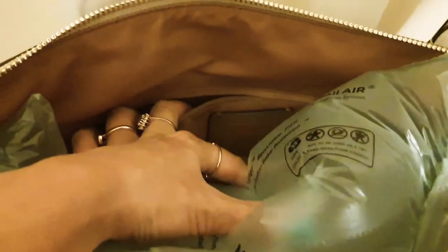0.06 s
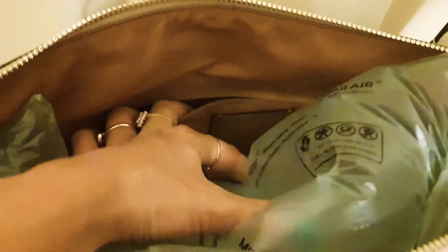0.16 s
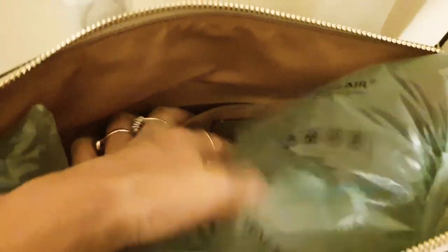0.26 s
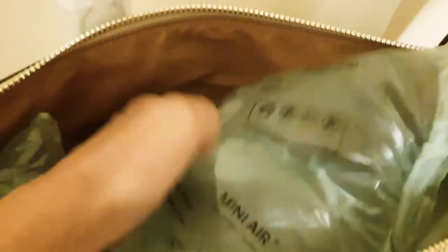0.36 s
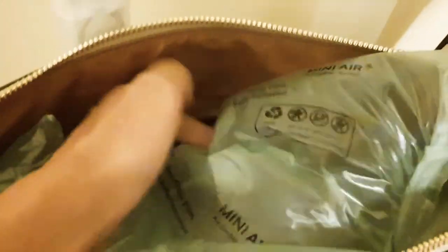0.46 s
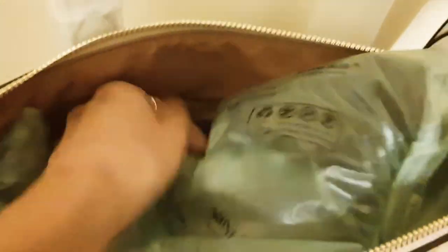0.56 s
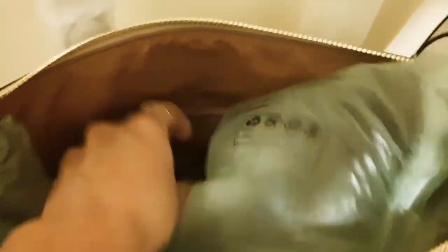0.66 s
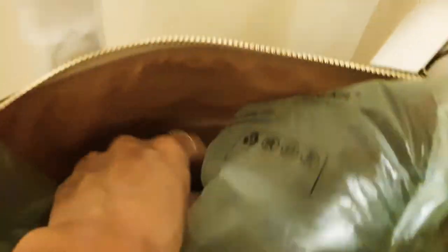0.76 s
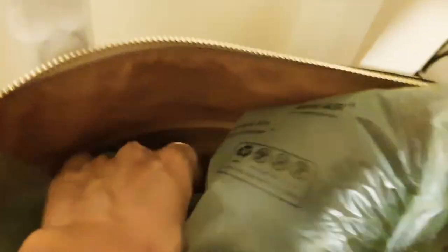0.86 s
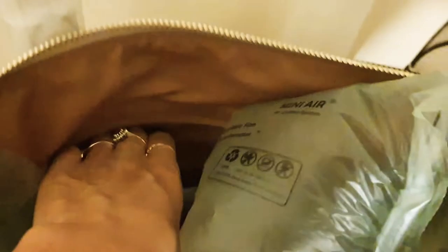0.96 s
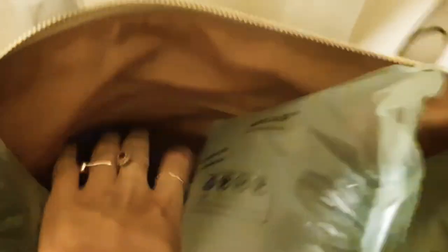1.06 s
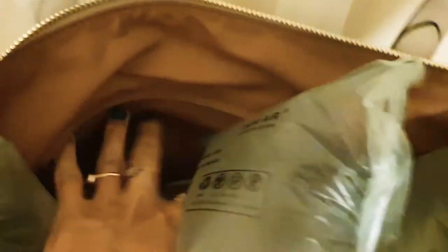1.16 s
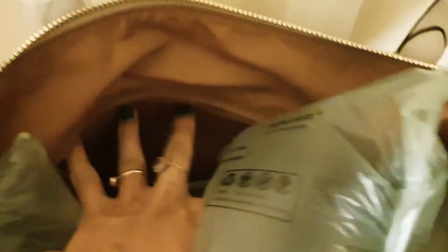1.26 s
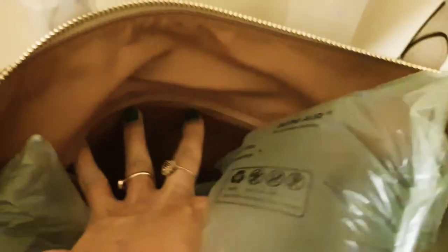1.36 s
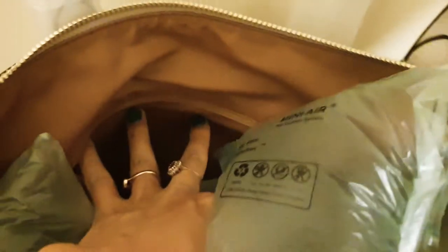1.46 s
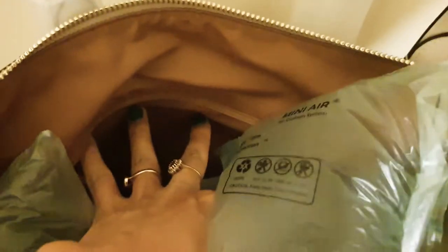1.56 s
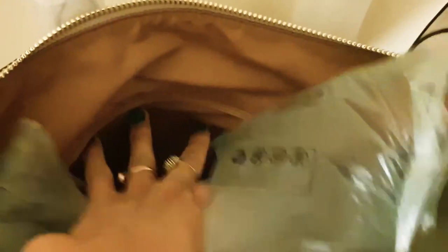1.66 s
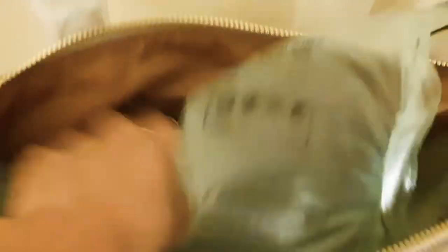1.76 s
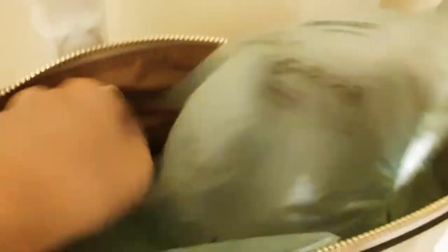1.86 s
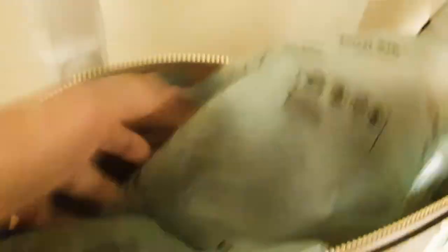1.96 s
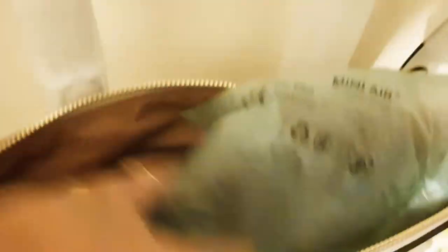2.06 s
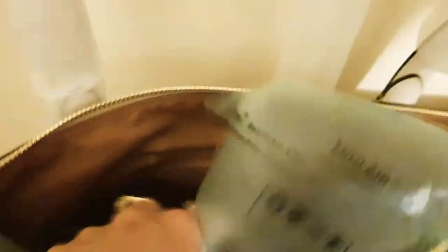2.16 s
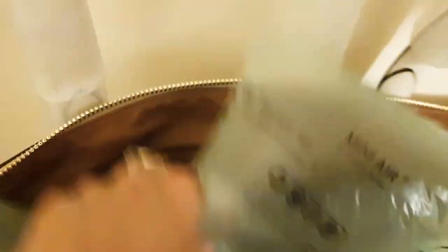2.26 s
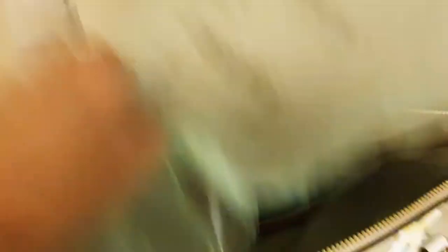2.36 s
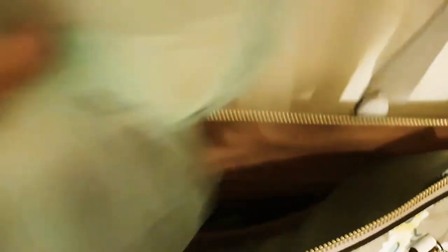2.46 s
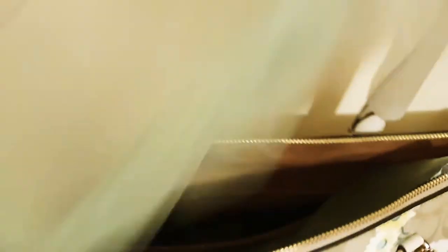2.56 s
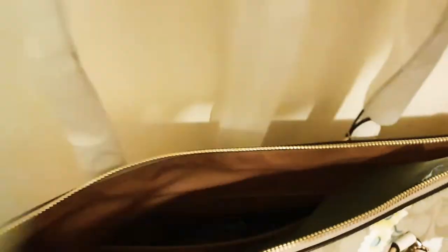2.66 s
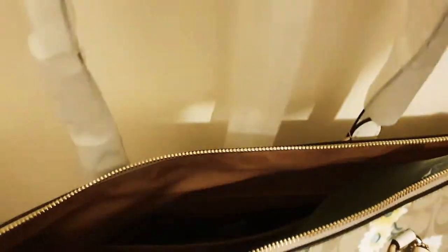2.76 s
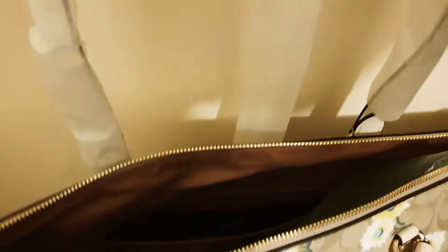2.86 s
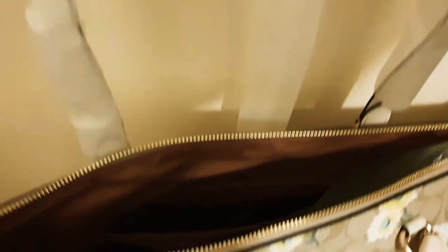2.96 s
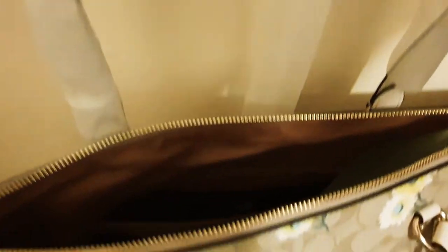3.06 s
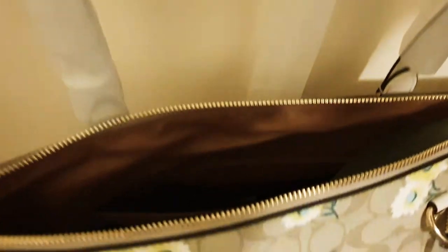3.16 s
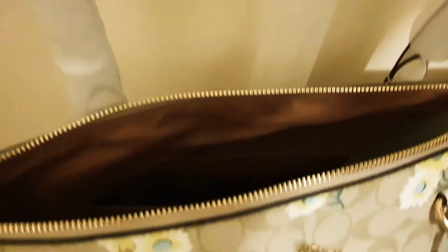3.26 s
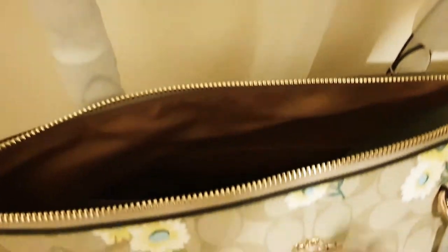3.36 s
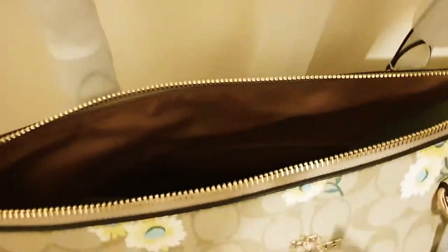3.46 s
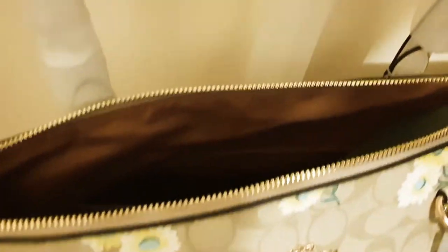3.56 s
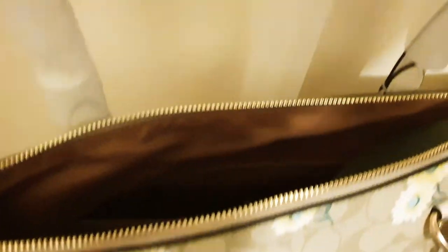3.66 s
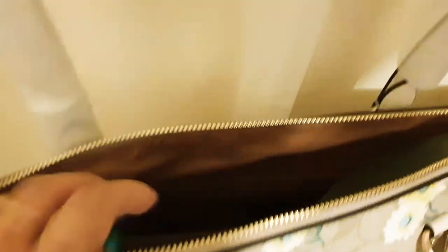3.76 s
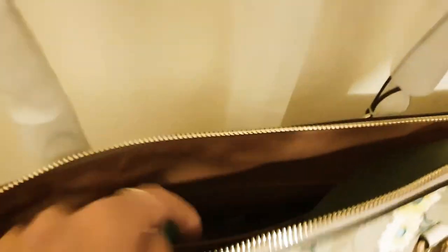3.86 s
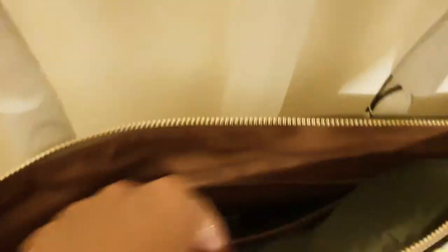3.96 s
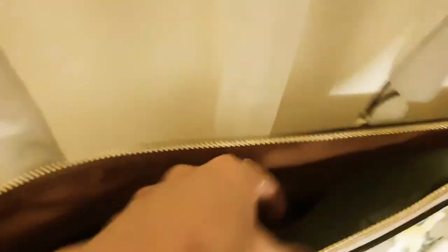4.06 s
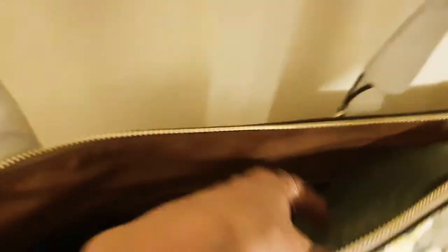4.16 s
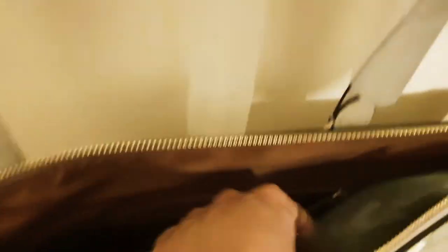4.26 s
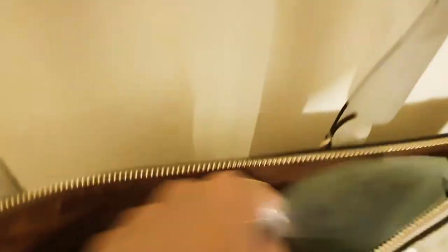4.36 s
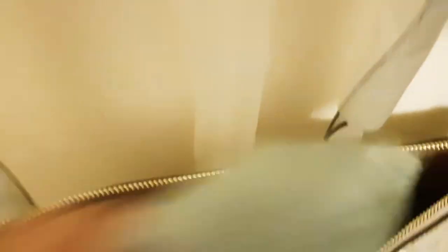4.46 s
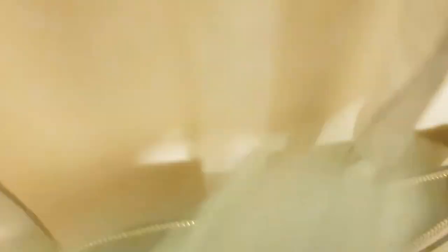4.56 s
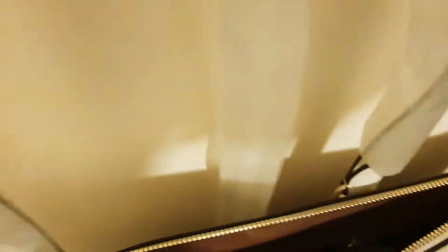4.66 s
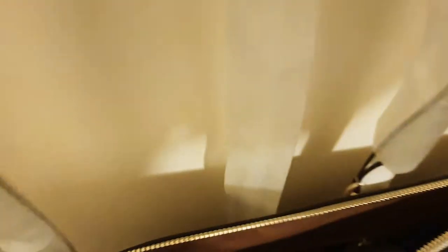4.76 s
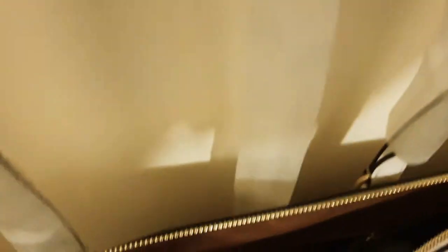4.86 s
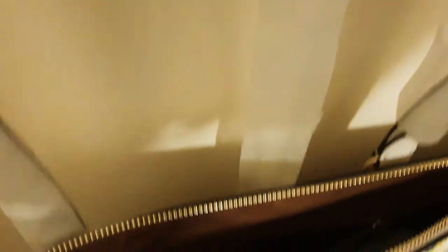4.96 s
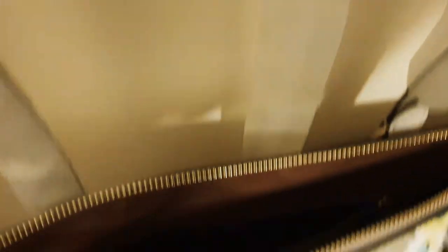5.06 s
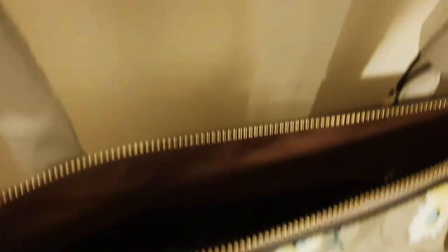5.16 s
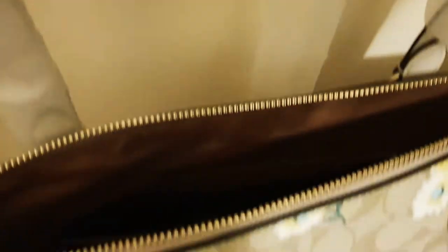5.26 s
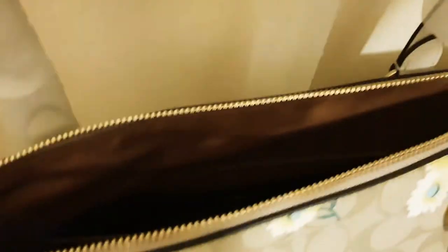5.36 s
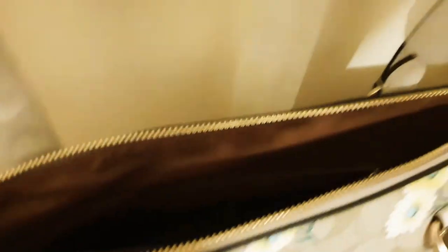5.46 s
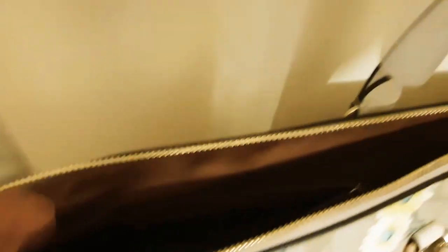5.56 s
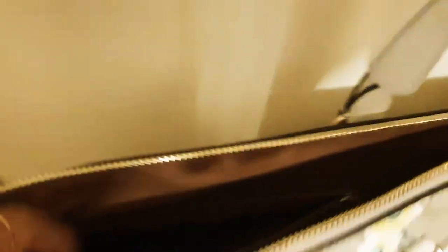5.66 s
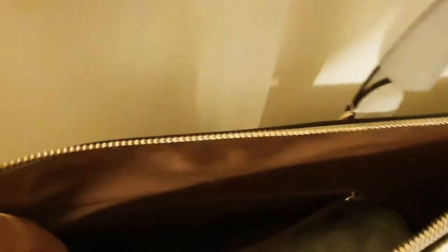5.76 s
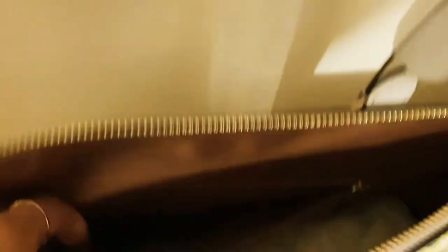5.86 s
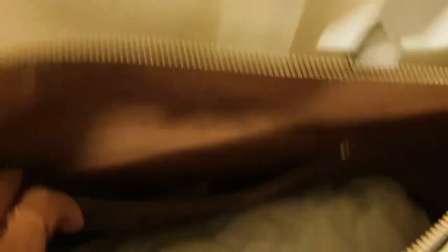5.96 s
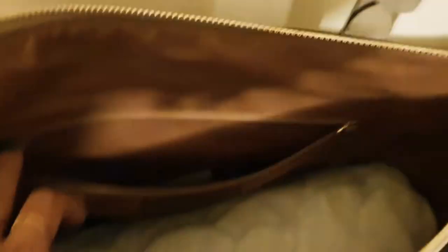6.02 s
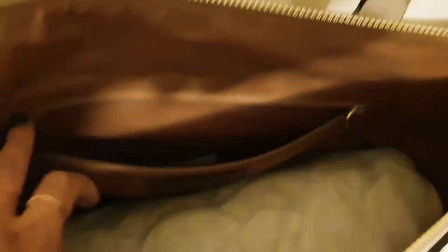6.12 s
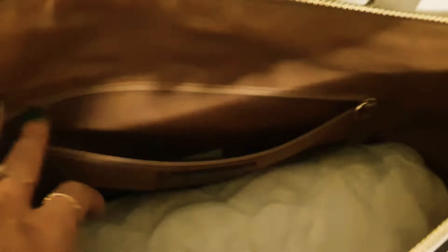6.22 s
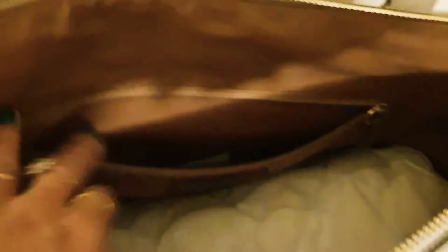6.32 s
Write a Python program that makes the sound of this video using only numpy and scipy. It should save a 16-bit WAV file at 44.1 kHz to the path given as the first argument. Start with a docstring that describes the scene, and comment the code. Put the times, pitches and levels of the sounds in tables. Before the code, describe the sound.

Very close stereo in a quiet furnished room with a low steady rumble. A hand drags inflated plastic pillows around a handbag: dense crinkling, sharp snaps and dull airy thumps, loudest just after two seconds. A pillow skids to rest with finer crackle. After a softer spell, another strong pull comes past four seconds, a second thin skid, then faint fingertip brushing on the cloth lining.

```python
"""Close stereo microphone, quiet furnished room, a low rumble throughout. A hand drags plastic air pillows
about in a lined handbag: film crackles as random tiny buckles, gripped air drums as decaying sines, single
creases snap as shaped noise, and the bag heaves as low-passed rumble. Around 3 s a pillow skids to rest
beside the bag and fingers brush the lining as coarser crackle. More pulls at 4 s, then another skid
and, to the end, more brushing of the cloth."""
import sys
import numpy as np
from scipy import signal
from scipy.fft import rfft, irfft, next_fast_len
from scipy.io import wavfile
from scipy.ndimage import uniform_filter1d

SR = 44100
rng = np.random.default_rng(int(sys.argv[2]) if len(sys.argv) > 2 else 0)


def materialize(psi):
    """Save the field psi as 16-bit PCM at rate SR to the path in sys.argv[1].

    A 1-D psi becomes a single channel; in a 2-D psi each row is a channel.
    """
    bounded = np.clip(np.atleast_2d(psi).T, -1, 1)
    quanta = np.round(bounded * 32767).astype(np.int16)
    wavfile.write(sys.argv[1], SR, quanta)


N = 281799  # samples

# broad resonances of the taut skin: f/Hz, gain/dB
SKIN_GAIN = [(250, -34.5), (420, -2.5), (500, -2), (720, 2), (830, -0.5), (930, -5.5), (1080, 1),
             (1300, -4), (1480, -17), (2500, -12), (6000, -49)]
# a crease snapping in open view, with all its treble: f/Hz, gain/dB
CRISP_GAIN = [(300, -19), (1000, -2), (3000, 2.5), (4200, -4.5), (7000, 2.5), (9600, -6), (13000, -1),
              (16000, 1.5)]
# a soft bump against the bag: f/Hz, gain/dB
BUMP_GAIN = [(40, -33), (100, -1), (150, -11.5), (200, 3.5), (260, -7.5), (350, -12.5), (600, -16),
             (2000, -57)]
# how much louder the bag is at the left port: f/Hz, level difference/dB
BAG_LEAN = [(100, 2), (250, 1), (450, 5.5), (1000, 4.5), (2000, 4), (3300, 2), (6000, 4.5), (8000, 8),
            (9200, -1), (16000, 1)]


def amp(db):
    """Decibels to gain."""
    return 10 ** (np.asarray(db) / 20)


def evened(x):
    """Scales to rms 1."""
    return x / np.sqrt(np.mean(x ** 2) + 1e-20)


def read(points, hz):
    """Reads a table along a log-frequency axis."""
    f, value = np.transpose(points)
    return np.interp(np.log(hz + 1), np.log(f + 1), value)


def add(mix, s, sound):
    """Mixes a stereo sound in at a time in seconds."""
    part = mix[:, max(round(s * SR), 0):][:, :sound.shape[1]]
    part += sound[:, :part.shape[1]]


def panned(left_db):
    """Gains of the two ports for a left-minus-right level difference."""
    return amp([[left_db / 2], [-left_db / 2]])


def colour(x, spectrum, size=2048):
    """Minimum-phase filter with the given spectrum, so that clicks keep a sharp front."""
    hz = abs(np.fft.fftfreq(size, 1 / SR))
    log_gain = np.log(amp(read(spectrum, hz)))
    response = np.exp(np.conj(signal.hilbert(log_gain)))
    taps = np.fft.ifft(response).real
    return signal.oaconvolve(x, taps[None], axes=1)[:, :x.shape[1]]


def ports(x, lead_ms, side=None, mono_hz=330):
    """Two close microphone ports: alike in the bass; higher up the left, nearer one leads."""
    # likeness of the two ports: f/Hz, likeness (0-1)
    likeness = [(100, 0.92), (230, 0.83), (400, 0.3), (1200, 0.52), (2500, 0), (8000, 0)]
    size = next_fast_len(x.shape[1] + 512)
    hz = np.fft.rfftfreq(size, 1 / SR)
    left, other = rfft(x, size)
    same = np.clip(read(likeness, hz), 0, 1)
    right = same * left + np.sqrt(1 - same ** 2) * other
    lag_s = lead_ms / 1000 * hz ** 4 / (hz ** 4 + mono_hz ** 4)
    right = right * np.exp(-2j * np.pi * hz * lag_s)
    lean = amp(read(side, hz) / 2) if side else 1
    return irfft(np.array([left * lean, right / lean]), size)[:, :x.shape[1]]


def strokes(rows):
    """Each stroke swells, holds and dies away; overlaps add in power. One gain curve per level column."""
    attack_curve = 1.37  # gain grows as this power of time
    release_db, release_curve = 21, 1.22  # fall over one release time; it quickens as the hand stops
    t, power = np.arange(0, N, 64) / SR, 0
    for start, attack, hold, release, *db in rows:
        swell = np.clip((t - start) / attack, 0, 1) ** attack_curve
        released = np.maximum(t - start - attack - hold, 0) / release
        fade = amp(-release_db * released ** release_curve)
        power = power + np.outer(amp(db), swell * fade) ** 2
    return [np.interp(np.arange(N) / SR, t, np.sqrt(p + 1e-18)) for p in power]


def crease(hz, ring_s=0.0005, ping_db=-3, scatter_db=-13, scatter_s=0.005, size=768):
    """One buckle: a crack, a brief ping of the facet, and scatter off the folds around it."""
    t = np.arange(size) / SR
    envelope = np.exp(-t / ring_s) + amp(scatter_db) * np.exp(-t / scatter_s)
    crack = rng.standard_normal((2, size)) * envelope
    ping = np.sin(2 * np.pi * (hz * t + rng.random((2, 1)))) * np.exp(-t * hz / 3.05)
    return evened(crack + amp(ping_db) * ping)


def crackle(per_s, spread_db, clump_db, clump_s=0.013, count=150):
    """Facets buckle at random moments, most small, a few large; their strength swells in short clumps."""
    facets = [crease(hz) for hz in np.geomspace(1200, 14000, count)]
    smoothing = [1, -np.exp(-1 / (clump_s * SR))]
    clumps = evened(signal.lfilter([1], smoothing, rng.standard_normal(N)))
    chance_db = spread_db * np.minimum(rng.exponential(1, N), 3.6)
    sizes = amp(chance_db + clump_db * np.clip(clumps, -2, 2))
    facet, out = rng.integers(0, count, N), np.zeros((2, N))
    for i in np.flatnonzero(rng.random(N) < per_s / SR):
        add(out, i / SR, sizes[i] * facets[facet[i]])
    return out


def played(x, gain, size=2600):
    """Makes the slow strength of a texture follow the hand's gain curve."""
    power = uniform_filter1d((x ** 2).mean(0), size)
    power = uniform_filter1d(power, size // 2)
    return x * gain / np.sqrt(abs(power) + 1e-20)


def walls(x, drift=0.18, drift_s=0.09):
    """Short echoes off nearby bag walls and surfaces comb the sound; their delays drift at random."""
    # echoes before drift: delay/ms, level/dB
    echoes = [(.6, -13), (1.3, -17.5), (3.1, -14.5), (7.3, -13)]
    at = np.arange(x.shape[1])
    knots, out = np.arange(0, len(at) + SR, drift_s * SR), x.copy()
    for ms, db in echoes:
        for port in range(2):
            wander = np.interp(at, knots, rng.standard_normal(len(knots)))
            delay = np.round(ms / 1000 * SR * np.exp(drift * wander)).astype(int)
            out[port] += amp(db) * x[port, np.maximum(at - delay, 0)]
    return out


def hum():
    """Low steady rumble of the room under a faint hiss: coloured noise."""
    # room tone: f/Hz, gain/dB
    tone_gain = [(20, -33), (33, -22), (46, 5.5), (58, -5.5), (75, 3.5), (110, -4), (190, -18.5),
                 (330, -21.5), (1000, -28), (3000, -28), (8000, -38), (16000, -56)]
    noise = colour(rng.standard_normal((2, N)), tone_gain, size=8192)
    return amp(-51.5) * evened(ports(noise, 0))


def pull(film, flutter, air):
    """Rubbing buckles the film; coarser slips flutter the skin and drum on the air inside."""
    # crackling film: f/Hz, gain/dB
    film_gain = [(300, -22), (900, -5), (1300, -13.5), (1550, -8.5), (1800, -4), (2050, -9), (2500, -2),
                 (3100, -2.5), (3800, -6), (6800, -5.5), (8200, -9), (9600, -12.5), (12000, -7.5),
                 (16000, -7.5)]
    # trapped air: f/Hz, gain/dB
    air_gain = [(30, -21.5), (70, -12), (125, -9.5), (180, -1.5), (235, 0.5), (310, -0.5), (420, -5.5),
                (700, -17), (2000, -35)]
    effort = film / amp(-30.5)  # 1 is the film level of an ordinary pull
    creases_per_s = 2700 * effort ** 0.5  # a harder pull buckles more facets
    rub = colour(walls(crackle(creases_per_s, 2.6, 1.8)), film_gain)
    ticks = colour(crackle(220, 3.9, 2.9, clump_s=0.017), CRISP_GAIN)  # stray and sharp
    skin = colour(walls(crackle(1000, 3.15, 1.0)), SKIN_GAIN)
    drumming = colour(crackle(600, 2.3, 1.8), air_gain)
    sound = amp(-0.57) * played(rub, film)
    sound += amp(-8.5) * played(ticks, film, size=9000)
    sound += amp(-1.5) * played(skin, flutter)
    sound += played(drumming, air)
    return ports(sound, 0.365, BAG_LEAN)


def heave(air, apart=0.36, sway_db=-18):
    """The bag's soft walls sway with every pull and shove: a deep rumble, partly different at each port."""
    # the whole bag is shoved: start t/s, attack t/s, hold t/s, release t/s, rumble level/dB
    shoves = [(1.195, 0.026, 0.0091, 0.031, -28), (1.43, 0.069, 0.011, 0.034, -37.5),
              (2.16, 0.11, .02, .08, -42), (2.56, 0.051, .06, 0.054, -34.5), (5.53, 0.11, 0.32, .25, -47.5)]
    # deep rumble of the bag: f/Hz, gain/dB
    rumble_gain = [(20, -38), (32, -3), (50, -5), (80, 6), (125, -1.5), (220, -27), (500, -55)]
    shove, = strokes(shoves)
    both, side = evened(colour(rng.standard_normal((2, N)), rumble_gain, size=8192))
    rumble = evened(np.array([both + apart * side, both - apart * side]))
    return rumble * np.hypot(shove, amp(sway_db) * air)


def room(x, size=22050):
    """A small furnished room: a short diffuse noise tail with its own decay time in each band."""
    # reverberation: f/Hz, time to fall 60 dB t/s
    decay = [(150, 0.068), (1000, 0.094), (4000, 0.11), (14000, 0.12)]
    hz, t, z = signal.stft(rng.standard_normal((2, size)), SR, nperseg=256)
    fade = amp(-60 * t / read(decay, hz)[:, None])
    onset = np.clip(t / 0.002, 0, 1)
    tail = signal.istft(z * fade * onset, SR, nperseg=256)[1]
    return signal.fftconvolve(x, tail / np.linalg.norm(tail[0]), axes=1)[:, :N]


def snaps(level_db=-5, buckle_s=0.0011, tail_db=-18, tail_s=0.0085, ping_db=2, q=4.3, size=2048):
    """A larger crease unzips in a millisecond or two and rings its facet."""
    # single creases: t/s, level/dB (before level_db), facet (0 broad to 1 narrow), left-right level/dB
    creases = [(0.0633, -22.5, 0.036, 2), (0.1365, -31.5, 0, 1), (0.157, -27.5, 0.2, 4),
               (0.451, -20.5, 0.75, 5), (1.0191, -16, 0.06, 6), (1.0952, -15, 1, 1), (1.395, -20.5, 0, 4),
               (1.447, -31, 0.18, 7), (1.5084, -22, 0, 2), (1.6115, -38, 0, 9), (2.3284, -15, 0, -8),
               (2.828, -28, 0, 7), (3.5416, -19, 1, 0), (3.6374, -35, 0, -5), (3.915, -37.5, 0.84, 1.5),
               (4.185, -40, 0, 3.5), (4.8095, -22.5, 0.29, 8), (4.8993, -26.5, 0.93, -2),
               (4.933, -24, 0.69, -3), (4.9416, -25, 0.88, -2), (5.0458, -16.5, 0.67, -9),
               (5.286, -25.5, 1, -2), (5.4176, -36.5, 0.11, 0), (5.5946, -32, 1, -4), (5.895, -32, 1, -1),
               (5.9324, -37, 0, 4), (5.9988, -39, 0.2, 3), (6.022, -37, 0.22, 8), (6.076, -30.5, 0.32, 5),
               (6.1734, -38, 0.94, 4), (6.2756, -42, 1, 6)]
    # ring of a broad and of a narrow facet: f/Hz
    facet_hz = [2740, 6060]
    out, t = np.zeros((2, N)), np.arange(size) / SR
    shape = t / buckle_s * np.exp(1 - t / buckle_s) + amp(tail_db) * np.exp(-t / tail_s)
    for s, db, facet, left_db in creases:
        crack = colour(rng.standard_normal((2, size)), CRISP_GAIN)
        ring_hz = np.interp(facet, [0, 1], facet_hz)
        ping = signal.lfilter(*signal.iirpeak(ring_hz, q, fs=SR), crack)
        snap = evened((crack + amp(ping_db) * ping) * shape) * np.sqrt(np.mean(shape ** 2))
        add(out, s, amp(db + level_db) * snap * panned(left_db))
    return out


def thumps(air_db=-2.0, skin_db=6, cycles=0.91, rise_s=0.0016, slip_s=0.0031, lead_s=0.00028, size=4096):
    """Gripped or slipping free, the trapped air bounces a cycle or two while the skin rings above it."""
    # grips and slips: t/s, air level/dB (before air_db), pitch of the air f/Hz,
    # skin ring level/dB (before skin_db), left-right level of the air/dB
    grips = [(0.294, -19, 239, -23, 2), (0.405, -23, 232, -24, 7), (1.021, -22, 219, -22, 0),
             (1.094, -26, 324, -26, 9), (1.188, -15, 260, -25, 2), (1.223, -19, 182, -20, 4),
             (1.311, -16.5, 242, -28, 2), (1.446, -22, 387, -23, -1), (1.506, -17.5, 188, -24, 5),
             (1.929, -17.5, 195, -31.5, 1), (2.243, -26, 785, -14, -5), (2.254, -29, 363, -16.5, -1),
             (2.267, -5.5, 241, -20, -2), (2.328, -5.5, 694, -33, -2), (2.427, -9.5, 790, -42, -3),
             (2.548, -15, 790, -34, 5), (2.572, -10.5, 480, -14.5, 10.5), (2.615, -9.5, 730, -28, 6),
             (3.33, -30.5, 203, -56, 0), (3.959, -31.5, 179, -52, -3), (4.53, -20.5, 248, -18, -11),
             (4.558, -17, 222, -19, 1), (5.773, -35.5, 194, -57, -5)]
    out, t = np.zeros((2, N)), np.arange(size) / SR
    age = np.maximum([t, t - lead_s], 0)  # the left port hears it first
    for s, db, hz, ring_db, left_db in grips:
        bounce = np.sin(2 * np.pi * hz * age) * np.exp(-age * hz / cycles)
        bounce = bounce * (1 - np.exp(-age / rise_s))
        slip = rng.standard_normal((2, size)) * np.exp(-t / slip_s)
        ring = ports(colour(slip, SKIN_GAIN), 0.42, BAG_LEAN)
        add(out, s, amp(db + air_db) * bounce / abs(bounce).max() * panned(left_db))
        add(out, s, amp(ring_db + skin_db) * ring / abs(ring).max())
    return out


def slide():
    """A loose pillow skids over the surface beside the bag: fine crackle, little body."""
    # skids: start t/s, attack t/s, hold t/s, release t/s, then before trim: film level/dB, air level/dB
    skids = [(2.953, 0.21, 0.203, 0.264, -31, -47.5), (3.421, 0.042, 0.085, 0.03, -32.5, -49.5),
             (3.612, 0.084, 0.0048, 0.057, -33.0, -41), (3.71, 0.036, 0.1, 0.07, -49, -59),
             (4.746, 0.053, 0.051, 0.063, -37, -47), (4.873, 0.027, 0.023, 0.081, -40.5, -51.0),
             (4.914, 0.15, 0.12, 0.16, -29.5, -48), (5.236, 0.038, 0.034, 0.048, -37.5, -51)]
    # sliding film: f/Hz, gain/dB
    sliding_gain = [(250, -19), (400, -10.5), (560, -3.5), (830, 1), (1050, 2.5), (1300, -3.5), (1600, -7),
                    (2400, -2.5), (3000, 0), (3900, -7), (6600, -0.5), (9700, -10.5), (13000, -6),
                    (16000, -6)]
    film, air = strokes(skids)
    skid = colour(walls(crackle(2400, 1.85, 2.3)), sliding_gain)
    drumming = colour(crackle(540, 3.9, 1.6), BUMP_GAIN)
    sound = amp(0.1) * played(skid, film) + amp(-4.5) * played(drumming, air)
    return ports(sound, 0.056)


def touch():
    """Fingertips catch on cloth threads and nudge the soft wall of the bag."""
    # brushes of the lining: start t/s, attack t/s, hold t/s, release t/s,
    # then before trim: cloth rustle level/dB, bag wall bumping level/dB
    brushes = [(3.905, 0.023, 0.21, 0.054, -48, -52.5), (5.39, 0.037, 0.099, 0.161, -52, -79),
               (5.585, 0.012, 0.055, 0.11, -39.5, -55), (5.695, 0.067, 0.042, 0.141, -52.5, -51),
               (5.833, 0.032, 0.1, 0.098, -55, -52), (5.988, 0.04, 0.047, 0.08, -44, -51.5),
               (6.158, 0.011, 0.038, 0.074, -54, -58), (6.284, 0.096, 0.03, 0.1, -57, -59.5)]
    # cloth: f/Hz, gain/dB
    cloth_gain = [(210, -54), (350, -8), (452, 2), (506, -11), (622, 3), (928, -0.5), (1060, -2),
                  (1850, -9), (2940, 1), (3180, -6.5), (6330, -4), (9140, -12.5), (16000, -9.5)]
    cloth, wall = strokes(brushes)
    rustle = colour(walls(crackle(1600, 2.1, 3.3)), cloth_gain)
    bumping = colour(crackle(280, 0.89, 1.2), BUMP_GAIN)
    sound = amp(-3.0) * played(rustle, cloth) + amp(-1.5) * played(bumping, wall)
    return ports(sound, 0.17)


def scene():
    """All handling sounds, their reverberation, the heaving bag and the room's rumble."""
    # drags inside the bag: start t/s, attack t/s, hold t/s, release t/s,
    # then before trim: film crackle level/dB, skin flutter level/dB, air drumming level/dB
    drags = [(0, 0.0021, 0.01, 0.18, -36.5, -39, -49), (0.165, 0.073, 0.073, 0.15, -33, -38.5, -42.5),
             (0.254, 0.126, 0.01, 0.14, -27.5, -33, -34), (0.463, 0.038, 0.083, 0.094, -37.0, -43, -44.5),
             (0.583, 0.12, 0.079, 0.096, -26.5, -33.5, -36), (0.807, 0.019, 0.082, 0.11, -31, -34.5, -40),
             (0.926, 0.02, 0.0046, 0.17, -27.0, -31, -35), (1.018, 0.078, 0.005, 0.069, -20, -23, -28.0),
             (1.125, 0.071, 0.0043, 0.29, -25.5, -28, -34), (1.36, 0.072, 0.09, 0.076, -38, -40, -39),
             (1.499, 0.0067, 0.0047, 0.015, -25.5, -27, -21.5), (1.62, 0.26, 0.049, 0.145, -24, -28.5, -33),
             (1.928, 0.088, 0.05, 0.071, -27.5, -34.0, -34), (2.059, 0.15, 0.45, 0.11, -22.5, -26, -30.5),
             (2.218, 0.03, 0.014, 0.068, -21, -21, -24.0), (2.318, 0.0059, 0.025, 0.065, -19.5, -22, -24),
             (2.706, 0.05, 0.005, 0.046, -30.5, -40.5, -51.5),
             (2.775, 0.041, 0.14, 0.052, -44, -52.5, -64.0), (4.14, 0.21, 0.025, 0.14, -29.5, -32.5, -36),
             (4.375, 0.16, 0.062, 0.16, -21, -24, -28.0), (4.679, 0.017, 0.013, 0.069, -28, -44, -40)]
    film, flutter, air = strokes(drags)
    near = pull(film, flutter, air) + snaps() + thumps() + slide() + touch()
    return near + amp(-10.5) * room(near) + heave(air) + hum()


def record(dry, low_hz=46, edge_hz=15900):
    """The microphone sheds the deepest bass; full-scale limit, then the band limit."""
    heard = signal.sosfilt(signal.butter(2, low_hz, "high", fs=SR, output="sos"), dry)
    taps = signal.firwin(511, edge_hz, window=("kaiser", 9), fs=SR)
    return signal.oaconvolve(np.clip(heard, -1, 1), taps[None], "same")


dry = scene()
out = record(dry)
materialize(out)
```